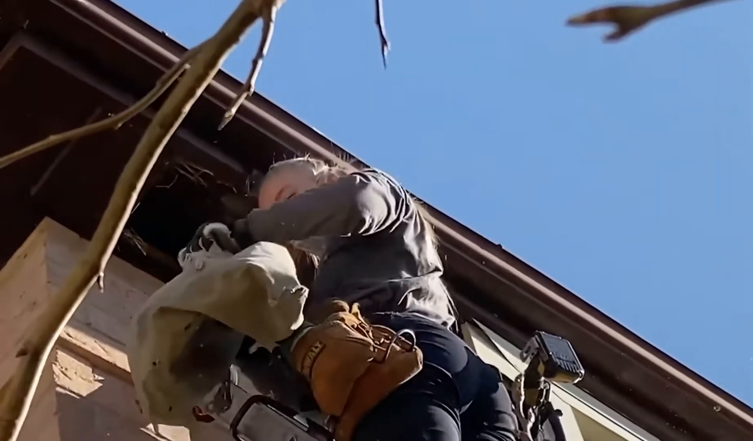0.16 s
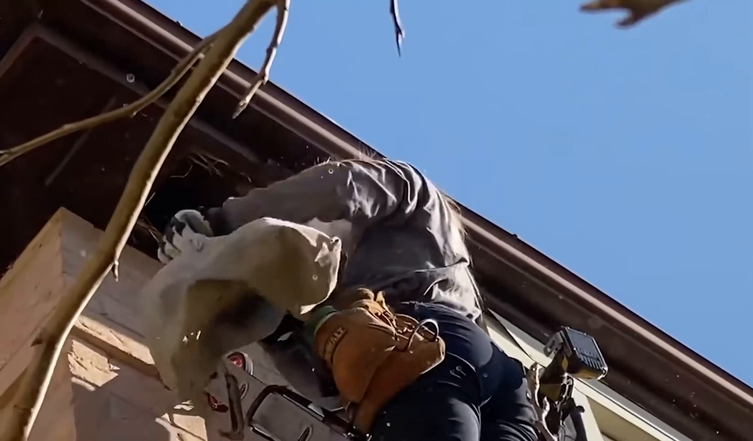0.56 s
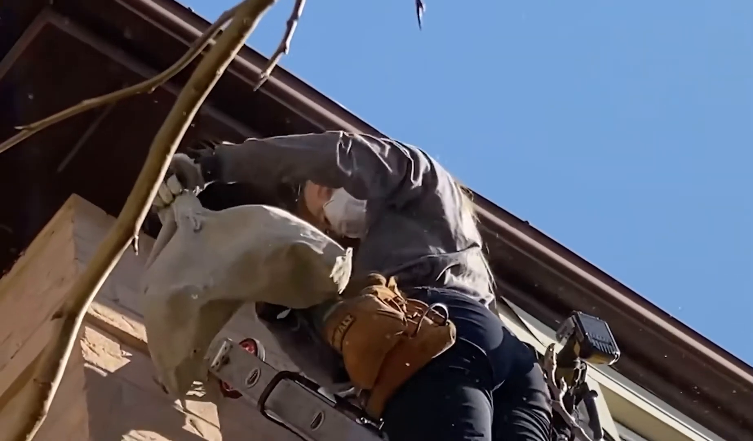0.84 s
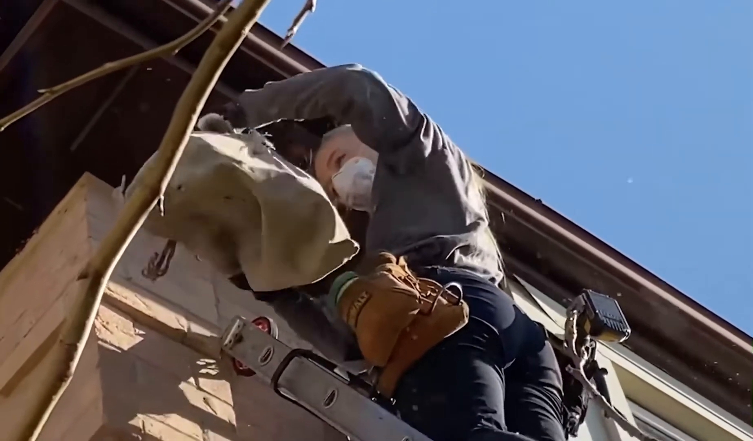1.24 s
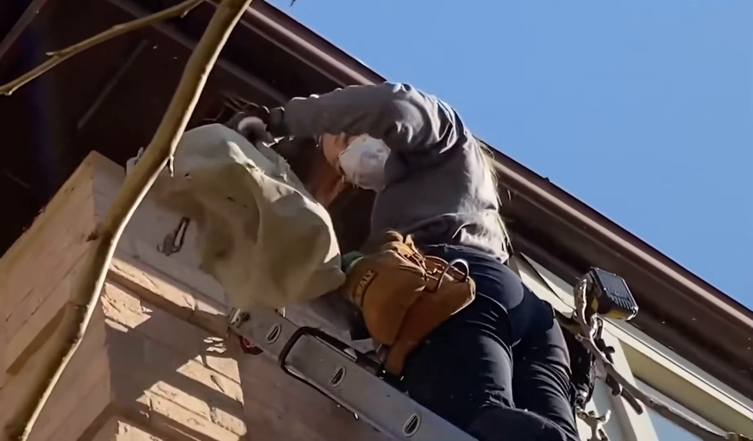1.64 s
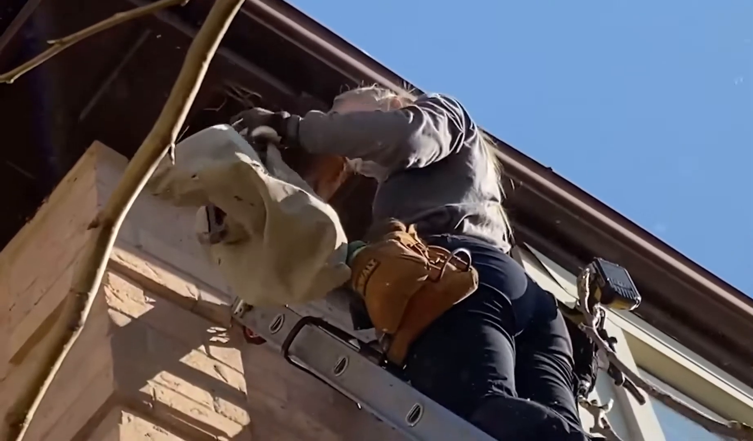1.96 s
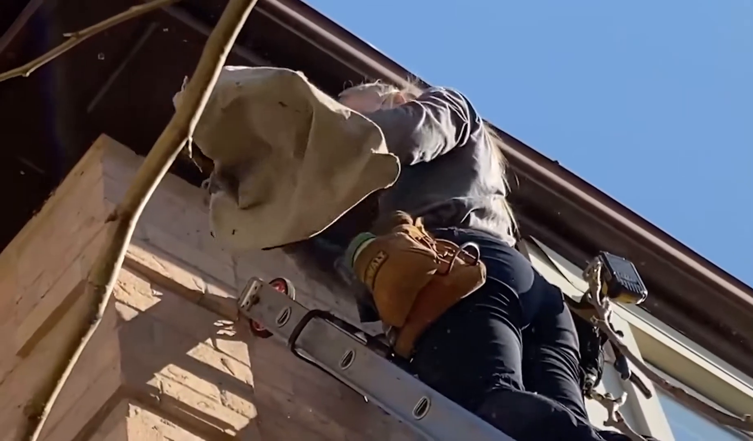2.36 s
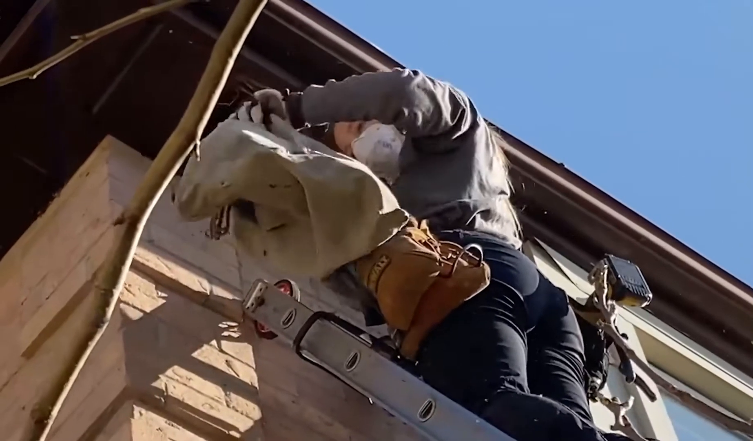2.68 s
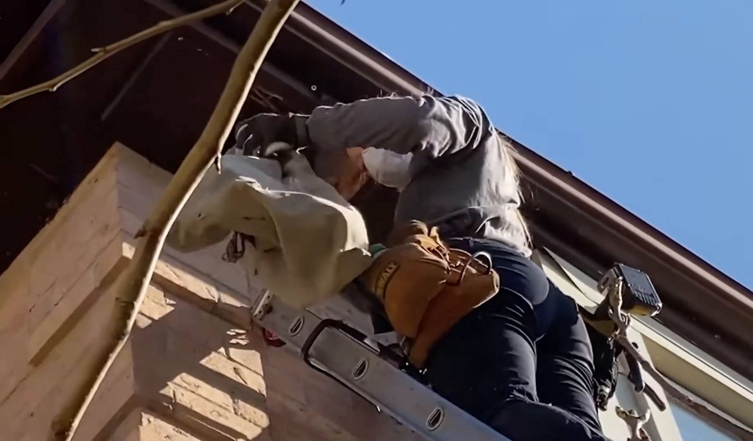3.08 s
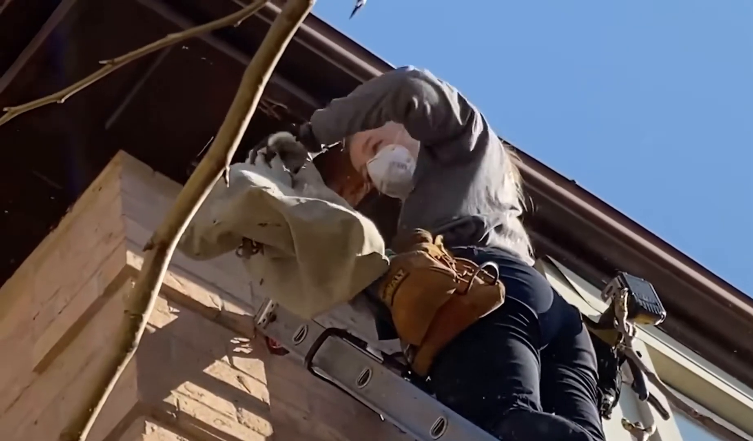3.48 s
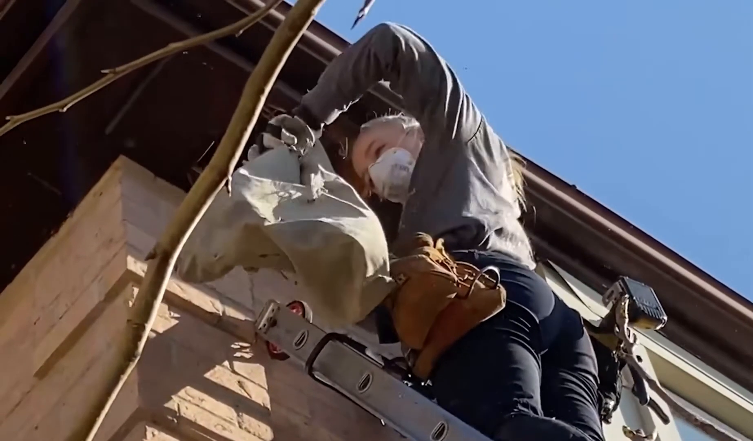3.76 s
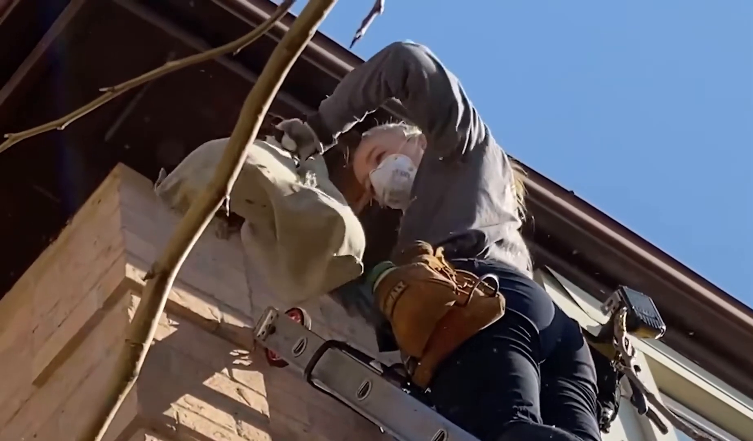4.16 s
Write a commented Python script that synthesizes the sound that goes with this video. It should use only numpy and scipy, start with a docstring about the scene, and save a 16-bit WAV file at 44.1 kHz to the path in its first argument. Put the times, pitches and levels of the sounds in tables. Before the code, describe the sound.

Outdoors by a house wall, a litter of baby raccoons breaks into raspy, high-pitched chittering with a few faint grunts underneath. Two wavering whines follow among weaker chirps, then the calls stop and a canvas bag rustles in a few short bursts. Faint birds, far traffic and a low mains hum lie behind. The calls spread wide in stereo, with a short reflection from the eave.

```python
"""Baby raccoons in a canvas bag under a roof eave break into rough, high chirps, flapping vocal folds
ringing their small throats over a blur of mewing. Faint birds call; low grunts sound under some chirps.
Near two seconds a thin whine rises, then another; from three seconds the litter is quiet, the canvas
rustles and a bird gives two high notes. Far traffic and a mains hum fill the yard throughout. The eave
and brick wall answer, and the treble sounds wide, nearing opposite phase left and right."""
import sys
import numpy as np
from scipy import signal
from scipy.fft import rfft, irfft, next_fast_len
from scipy.io import wavfile
from scipy.ndimage import uniform_filter1d, map_coordinates

SR = 44100
rng = np.random.default_rng(int(sys.argv[2]) if len(sys.argv) > 2 else 0)


def log_audio(samples):
    """Write samples as a 16-bit WAV file to the path given in sys.argv[1]."""
    # one column per channel
    frames = np.atleast_2d(samples).T
    # limit to full scale, then quantise
    limited = np.clip(frames, -1, 1)
    pcm = np.round(limited * 32767).astype(np.int16)
    wavfile.write(sys.argv[1], SR, pcm)


N = 190644

# The kits' chirps; rise and fall span the top 6 dB of the swell:
# peak_s, rise_ms, fall_ms, pitch_hz, rasp_hz, roughness (capped at 1), fundamental_db, octave_db, rasp_db
CHIRPS = [(0.004, 4, 36, 1797, 2614, 0.8, -48, -34, -32),
          (0.062, 15, 7.8, 2263, 3004, 0.85, -29.5, -38, -25.5),
          (0.14, 7, 8, 1920, 3175, 0.8, -38.5, -29, -25.5),
          (0.215, 12, 7.2, 1892, 3210, 0.42, -37, -23.5, -28),
          (0.286, 12, 12, 1904, 3090, 0.16, -36.5, -22, -28.5),
          (0.318, 12, 16, 1900, 3000, 0.08, -58, -31.5, -38.5),
          (0.381, 13, 9.2, 2034, 3000, 0.75, -34, -25.5, -32),
          (0.412, 9, 5.8, 2024, 3085, 0.9, -60, -48.5, -43.5),
          (0.743, 6.4, 10.2, 2060, 2344, 0.8, -44, -41.5, -34),
          (0.816, 7.7, 8.7, 1829, 2800, 0.87, -53, -33, -28),
          (0.9, 6, 9, 1850, 2893, 0.74, -41, -21.5, -24), (1.012, 17, 8, 1794, 2950, 0.6, -41.5, -30, -30),
          (1.127, 5.6, 6.5, 1800, 2600, 0.9, -49.5, -50.5, -50.5),
          (1.424, 6.2, 5.7, 1827, 3290, 0.2, -36.5, -26, -36.5),
          (1.452, 11, 9, 1840, 2390, 0.25, -50, -39, -45),
          (1.482, 8.2, 26, 2027, 2890, 0.5, -28, -22.5, -29),
          (1.555, 15, 22, 2001, 3140, 0.85, -36.5, -18.5, -20),
          (1.644, 10.4, 18, 2055, 3003, 0.7, -30.5, -25, -27.5),
          (1.744, 14, 12, 2120, 2940, 0.8, -30, -25.5, -28),
          (1.803, 14, 24, 1900, 3074, 0.3, -41.5, -36.5, -29),
          (1.823, 11.3, 20.7, 2090, 3000, 0.55, -29, -29.5, -27),
          (2.01, 17, 6.5, 2047, 3310, 0, -54, -65, -40), (2.094, 4.5, 8.5, 1960, 3320, 0.8, -54, -62, -55),
          (2.268, 7, 7, 1800, 2680, 1.13, -51.5, -52, -45.5),
          (2.336, 13, 14, 1700, 2400, 0.84, -47.5, -41, -36.5),
          (2.372, 14, 18, 1946, 2530, 1.1, -53.5, -50.5, -46),
          (2.412, 9, 6.1, 1900, 3000, 0.9, -53, -50, -50.5),
          (2.452, 6.8, 9, 1800, 3200, 0.6, -62, -55, -52.5),
          (2.77, 21, 8, 1780, 2500, 0.64, -57.5, -75, -54.5)]
# Held whines, one contour each: time_s, pitch_hz, level_db
WHINES = [
    [(1.87, 2000, -60), (1.9, 1912, -44), (1.952, 1872, -51), (1.998, 2010, -43), (2.03, 2020, -57)],
    [(2.405, 1858, -52), (2.455, 1858, -53), (2.52, 1893, -47), (2.565, 1880, -49), (2.585, 1850, -60),
     (2.607, 1760, -50), (2.687, 1871, -51), (2.713, 1850, -50), (2.745, 1600, -59), (2.76, 1600, -68)],
]
# Colour of the kits' breath: frequency_hz, density_db
BREATH_COLOUR = [(3500, -36.5), (4600, 3.5), (5100, -2.5), (5700, -1), (6700, -6), (7300, -1), (8600, -6.5),
                 (9700, -9.5), (11000, -8), (14000, -18), (15500, -19)]


def chirps():
    """Each puff of air sounds fluttering partials while fold slaps ring the throat, under one swell."""
    glide, hoarse_ratio = 0.01603, 0.95  # the octave's hoarse part rings a little under it
    throat_width_hz, octave_width_hz = 1200, 580
    grunt_start_hz, grunt_sinks_hz_per_s = 1606, 190  # the chest grunt deepens as the litter tires
    hiss_fades_db_per_s = 5.5  # duller as the kits sink into the bag
    out, n = np.zeros(N + SR), SR // 5
    ms = (np.arange(n) - n // 2) * 1000 / SR
    for chirp in CHIRPS:
        peak_s, rise_ms, fall_ms, pitch_hz, rasp_hz, rough, fundamental_db, octave_db, rasp_db = chirp
        rough = np.clip(rough, 0, 1)
        flatness = 1.1 + (rise_ms + fall_ms) / 18  # short puffs are pointed, long ones flat-topped
        swell = amp(-6 * np.abs(ms / np.where(ms < 0, rise_ms, fall_ms)) ** flatness)
        bend = 1 + glide * np.tanh(ms / 12) + 0.0065 * wobble(60, n)  # bends up through the peak
        flaps = fold_slaps(n, rate_hz=rng.uniform(290, 380))
        clear = tone(2 * pitch_hz * bend, 0.073, rate=100)
        hoarse = throat(flaps, hoarse_ratio * 2 * pitch_hz, octave_width_hz)
        squeak = tone(rasp_hz * bend, .8, rate=420)
        rasp = (throat(flaps, rasp_hz, throat_width_hz) + squeak) / np.sqrt(2)
        grunt = throat(flaps, grunt_start_hz - grunt_sinks_hz_per_s * peak_s, throat_width_hz)
        hiss = unit(filtered(flaps, lambda hz: amp(along(BREATH_COLOUR, hz))))
        hiss_db = 3 + 1.19 * loudness(chirp) - hiss_fades_db_per_s * peak_s  # louder chirps hiss more
        voice = amp(fundamental_db) * tone(pitch_hz * bend, .65 * rough, rate=300)
        voice += amp(octave_db) * (np.sqrt(1 - rough) * clear + np.sqrt(rough) * hoarse)
        voice += amp(octave_db - 17) * tone(3 * pitch_hz * bend, rough, rate=520)
        voice += amp(rasp_db) * rasp + amp(-30.5 + 0.44 * rasp_db) * grunt + amp(hiss_db) * hiss
        out[round(peak_s * SR):][:n] += swell * voice
    return out[n // 2:][:N]


def fold_slaps(n, rate_hz, scatter_db=2.5):
    """The vocal folds flap unevenly, each flap letting out a short puff of noisy air."""
    turns = np.cumsum(rate_hz * amp(scatter_db * wobble(200, n))) / SR
    return (amp(-14 * (turns % 1)) + 0.08) * (1.5 + rng.standard_normal(n))


def throat(x, hz, width_hz):
    """One throat resonance, applied twice for steep skirts; comes out at rms 1."""
    return unit(filtered(x, lambda f: (1j * f * width_hz / (hz * hz - f * f + 1j * f * width_hz)) ** 2))


def grunts():
    """Under some of the chirps, a few fold slaps ring the low throat."""
    # Low grunts: peak_s, throat_hz, level_db
    low_grunts = [(0.816, 1010, -48), (1.632, 1200, -48), (1.8, 1100, -47), (2.264, 1020, -51),
                  (2.771, 830, -48)]
    half_length_ms = 8
    out, n = np.zeros(N + SR), SR // 10
    ms = (np.arange(n) - n // 2) * 1000 / SR
    for peak_s, throat_hz, level_db in low_grunts:
        voice = throat(fold_slaps(n, rate_hz=330), throat_hz, width_hz=380)
        out[round(peak_s * SR):][:n] += amp(level_db - 6 * (ms / half_length_ms) ** 2) * voice
    return out[n // 2:][:N]


def whines():
    """A held, wavering, slightly hoarse cry with its octave, faint upper partials and breath."""
    out = np.zeros(N)
    for contour in WHINES:
        hz, db, gate = curves(contour)
        hz = hz * (1 + .005 * wobble(90))
        edge = amp(-22) * (tone(4 * hz, 0.8, rate=790) + tone(5 * hz, 0.69, rate=900))
        edge += amp(-23) * noise(BREATH_COLOUR)
        fundamental_db = db - 7 * np.maximum(wobble(50), 0) ** 2  # the cry catches
        octave_db = db - 0.5 - 7 * np.maximum(wobble(50), 0) ** 2
        octave = tone(2 * hz, rough=.4, rate=300)
        fundamental = tone(hz, rough=.4, rate=200)
        out += gate * (amp(fundamental_db) * fundamental + amp(octave_db) * (octave + edge))
    return out


def mewing():
    """Small hoarse voices blur into a lumpy rasp that swells with each chirp and lies under each whine."""
    # Throat resonances of the litter: centre_hz, width_hz, gain_db
    formants = [(2170, 280, -2), (2634, 570, -1), (3730, 720, 1), (4100, 710, -15.5), (4580, 130, -10.5),
                (6240, 1600, -16.5)]
    builds_db_per_s, opens_db_per_s, bout_gap_s = 302.5, 1500, .15  # after a pause it starts at once
    hiss_fades_db_per_s = 4.5
    rasp = unit(sum(amp(db + 4 * wobble(35.02)) * throat(rng.standard_normal(N), hz, width_hz)
                    for hz, width_hz, db in formants))
    hiss = noise(BREATH_COLOUR) * amp(1.2 * wobble(51))
    hiss *= amp(-5 - hiss_fades_db_per_s * np.arange(N) / SR)
    gaps_s = np.diff([chirp[0] for chirp in CHIRPS], prepend=0)
    calls = [(chirp[0], loudness(chirp), builds_db_per_s if gap_s < bout_gap_s else opens_db_per_s)
             for chirp, gap_s in zip(CHIRPS, gaps_s)]
    level = amp(-17) * swells(calls, dies_db_per_s=114) + amp(-42.5) * swells(calls, dies_db_per_s=34)
    level += sum(gate * amp(db - 13) for _, db, gate in map(curves, WHINES))
    return level * (rasp + hiss)


def rustles():
    """Canvas creases in bursts of crackle that die away, and slides softly."""
    # Creasing folds: start_s, relative_db, t60_s
    creases = [(3.0174, -50, 0.21), (3.5109, -42.5, 0.3), (3.5728, -50, 0.35), (3.7663, -44, 0.056),
               (4.133, -52.5, 0.34)]
    # Cloth slides: peak_s, level_db
    slides = [(3.13, -67), (3.52, -65), (3.58, -62.5), (3.77, -74), (4.16, -67.5)]
    # Colours of creasing and of sliding: frequency_hz, density_db
    crease_colour = [(500, -39), (1200, 14), (3500, 1.5), (7000, -2), (15000, -16.5)]
    slide_colour = [(900, -43), (1800, -1.5), (3300, -4.5), (4500, -7.5), (7000, -15.5), (15000, -24.5)]
    attack_s, crease_gain_db, slide_builds_db_per_s = .004, -11, 152
    out, t = np.zeros(N + SR), np.arange(SR // 2) / SR
    snap = 1.4 * amp(-60 * t / 0.03)  # the dry tick as a fold gives way
    for start_s, relative_db, t60_s in creases:
        crackle = noise(crease_colour, len(t)) * amp(3 * wobble(300, len(t)))
        body = amp(-60 * t / t60_s) * (1 - np.exp(-t / attack_s))
        out[round(start_s * SR):][:len(t)] += amp(crease_gain_db + relative_db) * (body + snap) * crackle
    sliding = swells([(s, db, slide_builds_db_per_s) for s, db in slides], dies_db_per_s=71)
    return out[:N] + sliding * amp(4.2 * wobble(40)) * noise(slide_colour)


def birds():
    """Thin far notes slide up, smeared by the air; the higher ones flutter faster."""
    # Bird notes: start_s, length_s, first_hz, last_hz, level_db
    notes = [(0.52, .065, 1400, 1500, -58), (0.605, .06, 1630, 1700, -56), (2.24, .1, 900, 1150, -63),
             (2.63, .07, 950, 1000, -56), (2.775, .105, 1320, 1410, -59), (3.93, .11, 6900, 6950, -66),
             (4.07, .21, 6800, 6900, -67)]
    rise_share, edge_drop_db = .45, 4
    out = np.zeros(N)
    for start_s, length_s, first_hz, last_hz, db in notes:
        onset = (start_s, first_hz, db - edge_drop_db)
        peak = (start_s + rise_share * length_s, first_hz + rise_share * (last_hz - first_hz), db)
        end = (start_s + length_s, last_hz, db - edge_drop_db)
        hz, level_db, gate = curves([onset, peak, end])
        out += gate * amp(level_db) * tone(hz, rough=.55 + first_hz / 2e4, rate=.06 * first_hz)
    return out


def eave(x):
    """The sound plus its diffuse answer from roof and wall; the swaying bag blurs the answer's pitch."""
    # Decay under the eave: frequency_hz, t60_s
    decay = [(500, .3), (3000, .28), (10000, .25)]
    hz, t, spectra = signal.stft(rng.standard_normal(SR // 2), SR, nperseg=256)
    _, tail = signal.istft(spectra * amp(-60 * t / along(decay, hz)[:, None]), SR, nperseg=256)
    blurred = np.pad(x * unit(wobble(350)), (500, 0))  # 11 ms of pre-delay
    return x + amp(-12) * signal.fftconvolve(blurred, tail / np.linalg.norm(tail))[:N]


def stereo_spread(x):
    """Mid and side, each with its own eave answer; the treble nears opposite phase left and right."""
    # Phase between the channels: frequency_hz, phase_half_turns
    phase = [(300, .1), (1500, 0.067), (2700, 0.28), (4100, 0.091), (4600, 0.57), (5000, 0.66),
             (5500, 0.45), (6900, 0.77), (7300, 0.91), (11800, 0.99), (12300, .65), (15500, .6)]
    angle = lambda hz: np.pi / 2 * np.clip(along(phase, hz), 0, 1)
    mid = filtered(eave(x), lambda hz: np.cos(angle(hz)))
    side = filtered(eave(x), lambda hz: 1j * np.sin(angle(hz)))
    return mid, side


def yard():
    """Mid and side of far traffic and air: centred bass, a wide wash above it, mids leaning left."""
    # Ebb of the traffic: time_s, rumble_db, drone_db
    traffic = [(0, -46, -49), (.6, -44, -50), (1.6, -45.5, -50), (2.4, -46.5, -51), (3.2, -44.5, -50.5),
               (4.32, -45, -50)]
    # Colours of traffic rumble, traffic drone, air and the wide wash: frequency_hz, density_db
    rumble_colour = [(12, -53.5), (20, -21), (43, 2), (81, 7.5), (136, -2), (176, -8), (234, -5),
                     (300, -27), (390, -28), (660, -120)]
    drone_colour = [(88, -29), (150, -7), (260, -4.5), (661, -13.5), (740, -12.5), (1740, -24), (2200, -35),
                    (2860, -76.5), (4840, -120)]
    air_colour = [(1000, -24), (1800, -13.5), (2400, -10.5), (3200, -10.5), (5000, -21.5), (7100, -23.5),
                  (7600, -58), (12000, -54), (14000, -43), (15500, -52)]
    wash_colour = [(18, -70.5), (30, -46), (213, -8.5), (420, -4.5), (518, 0.5), (639, -3.5), (728, 1),
                   (1360, -7), (2130, -32), (5170, -33), (6540, -37.5), (14000, -36.5), (15500, -45)]
    # Pull to the left: frequency_hz, side_share
    lean = [(100, .002), (220, .06), (400, 0.23), (700, .45), (1400, 0.45), (2200, .01)]
    rumble_db, drone_db, _ = curves(traffic)
    rumble = amp(rumble_db + 0.79 * wobble(3.8)) * noise(rumble_colour)
    drone = amp(drone_db + 1.5 * wobble(7.1)) * noise(drone_colour)
    air = noise(air_colour)
    low_air = filtered(air, lambda hz: 1 / (1 + (hz / 4300) ** 6))  # low and high air gust apart
    gusts = amp(2.5 * wobble(9.7)) * low_air + amp(2.3 * wobble(17)) * (air - low_air)
    mid = rumble + drone + amp(-73.5) * gusts
    wash = amp(-55.5 + .7 * wobble(5)) * noise(wash_colour)
    return mid, wash + filtered(mid, lambda hz: along(lean, hz))


def hum():
    """Mains hum and its harmonics, each wavering a little."""
    # Rise and fall of the hum: time_s, level_db
    contour = [(0.0, -49), (0.31, -43), (0.9, -46), (1.33, -53), (2.3, -51), (2.48, -58.5), (2.65, -50.5),
               (3.45, -56.5), (3.65, -48.5), (3.83, -49.5), (3.92, -46.5), (4.32, -45)]
    # Its harmonics: multiple, gain_db
    harmonics = [(1, 0.5), (2, -11), (3, -10), (5, -20)]
    level_db, _ = curves(contour)
    pitch_hz = np.full(N, 121)
    return sum(amp(level_db + gain_db + 0.66 * wobble(7.9)) * tone(multiple * pitch_hz, 0.044, rate=8)
               for multiple, gain_db in harmonics)


def amp(db):
    """dB to gain."""
    return 10 ** (np.asarray(db) / 20)


def unit(x):
    """Scale to rms 1."""
    return x / np.sqrt(np.mean(np.abs(x) ** 2) + 1e-20)


def loudness(chirp):
    """dB of a chirp's octave and rasp together."""
    *_, octave_db, rasp_db = chirp
    return 10 * np.log10(amp(octave_db) ** 2 + amp(rasp_db) ** 2)


def along(points, hz):
    """Read (frequency_hz, value) points on a log frequency axis."""
    knots_hz, values = np.transpose(points)
    return np.interp(np.log(hz + 1), np.log(knots_hz + 1), values)


def curves(rows):
    """An automation curve for each column after the time, then a soft gate over their span."""
    times_s, *columns = np.transpose(rows)
    t = np.arange(N) / SR
    gate = uniform_filter1d(1. * ((t >= times_s[0]) & (t <= times_s[-1])), size=400)
    return [np.interp(t, times_s, column) for column in columns] + [gate]


def swells(rows, dies_db_per_s):
    """Gain curve of (peak_s, level_db, builds_db_per_s) swells, added in power."""
    t = np.arange(N) / SR
    return np.sqrt(sum(amp(db - np.where(t < peak_s, builds, dies_db_per_s) * np.abs(t - peak_s)) ** 2
                       for peak_s, db, builds in rows))


def wobble(rate, n=N):
    """A smooth random curve, rate knots a second."""
    return map_coordinates(rng.standard_normal(int(n * rate / SR) + 4), [np.arange(n) * rate / SR])


def filtered(x, response):
    """x through a complex frequency response."""
    size = next_fast_len(len(x) + 8192)
    return irfft(rfft(x, size) * response(np.fft.rfftfreq(size, 1 / SR)), size)[:len(x)]


def noise(colour, n=N):
    """Noise of rms 1 with a (frequency_hz, density_db) colour."""
    return unit(filtered(rng.standard_normal(n), lambda hz: amp(along(colour, hz))))


def tone(hz, rough, rate):
    """A sine of rms 1 whose strength and phase flutter by the share rough, rate knots a second."""
    flutter = unit(wobble(rate, len(hz)) + 1j * wobble(rate, len(hz)))
    share = np.clip(rough, 0, 1)
    carrier = np.exp(2j * np.pi * np.cumsum(hz) / SR)
    return np.sqrt(2) * np.real((np.sqrt(1 - share) + np.sqrt(share) * flutter) * carrier)


def scene():
    """Litter, birds and bag ring under the eave and spread in stereo; yard and hum lie under them."""
    mid, side = stereo_spread(chirps() + grunts() + whines() + mewing() + birds() + rustles())
    far_mid, far_side = yard()
    mid, side = mid + far_mid + hum(), side + far_side
    return np.array([mid + side, mid - side])


def record(dry):
    """The input stage rounds off the highest peaks; the last moment fades; the very top is cut away."""
    ceiling, fade_s, top_hz = .5, .004, 15700
    soft = dry / (1 + np.abs(dry / ceiling) ** 4) ** (1 / 4)
    fade = np.sin(np.pi / 2 * np.clip(np.arange(N)[::-1] / (fade_s * SR), 0, 1)) ** 2
    return np.array([filtered(channel, lambda hz: hz < top_hz) for channel in soft * fade])


dry = scene()
out = record(dry)
log_audio(out)
```